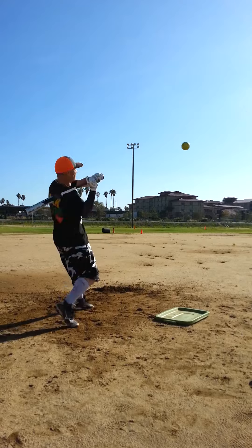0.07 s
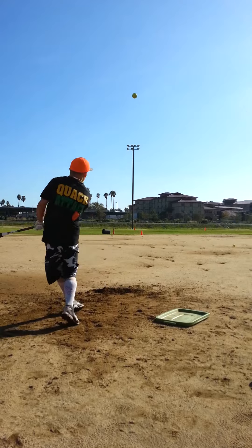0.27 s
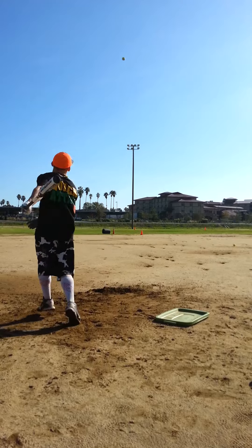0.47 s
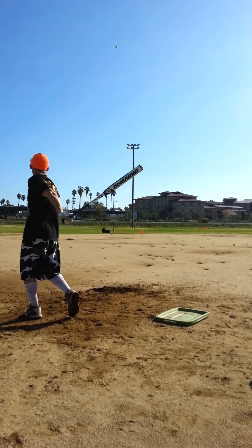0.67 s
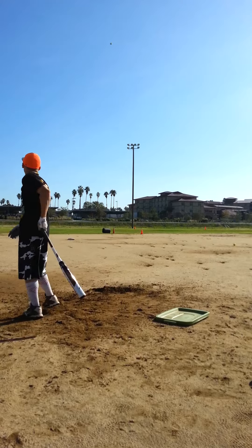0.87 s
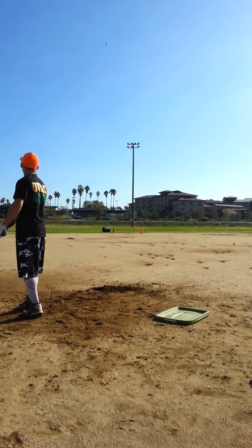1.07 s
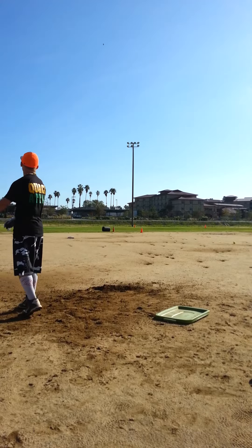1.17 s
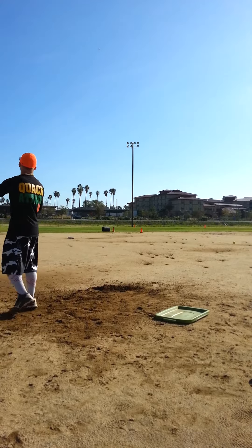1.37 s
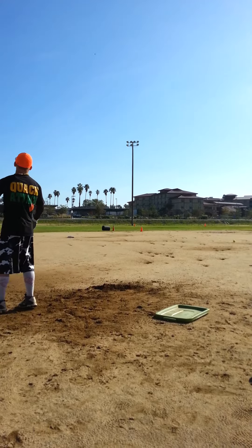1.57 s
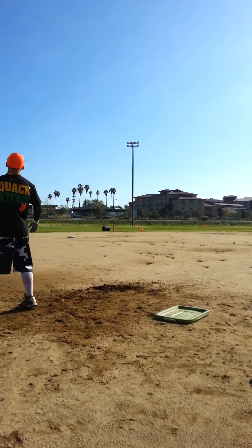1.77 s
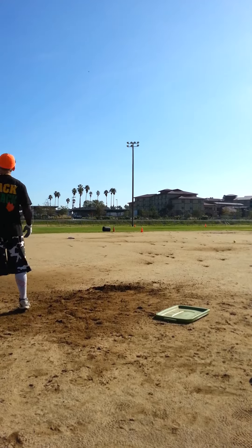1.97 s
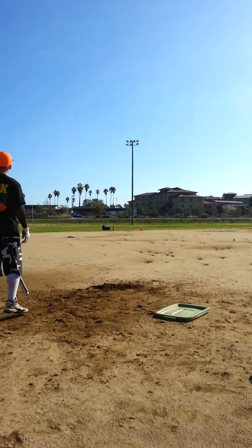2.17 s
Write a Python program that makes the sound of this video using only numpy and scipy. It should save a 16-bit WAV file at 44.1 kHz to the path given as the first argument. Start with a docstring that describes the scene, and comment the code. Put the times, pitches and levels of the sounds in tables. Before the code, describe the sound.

A bat cracks sharply against a softball on an open field, over faint wind.

```python
"""Open dirt field: light wind bumps two microphone ports over a distant traffic wash and a thin hiss.
The batter's shoes scuff the dirt. At 0.23 s a bat cracks against a softball a few metres away:
damped modes plus a burst of squeezed-out air, overloading the microphone. Two quick reflections
follow, then fainter slaps and a scattered tail with a faint falling ring.
More scuffs as the batter steps away; a small gust near 1.8 s."""
import sys
import numpy as np
from scipy import signal
from scipy.fft import rfft, irfft
from scipy.io import wavfile
from scipy.ndimage import uniform_filter1d

SR = 44100
rng = np.random.default_rng(int(sys.argv[2]) if len(sys.argv) > 2 else 0)


def unload_audio(sound):
    """Save the sound as a 16-bit wav file, at the path given as the first command line argument."""
    columns = np.transpose(np.atleast_2d(sound))
    # keep every value between -1 and 1, then stretch to whole-number steps
    steps = np.round(np.clip(columns, -1, 1) * 32767)
    wavfile.write(sys.argv[1], SR, steps.astype(np.int16))


N = 97020
T = np.arange(N) / SR
HIT_S = .2261
AGE_S = np.maximum(T - HIT_S, 0)


def undb(db):
    """Decibels to gain."""
    return 10 ** (np.asarray(db) / 20)


def curve(rows):
    """Gain over time from (s, dB) points."""
    return undb(np.interp(T, *np.array(rows).T))


def pan(db):
    """Constant-power stereo gains; db is left over right."""
    gains = undb([[db / 2], [-db / 2]])
    return gains / np.sqrt(np.mean(gains ** 2))


def noise(spectrum, correlation):
    """Unit-rms stereo noise shaped by (Hz, dB) points."""
    hz, db = np.array(spectrum).T
    gain = undb(np.interp(np.log(np.fft.rfftfreq(N, 1 / SR) + 1), np.log(hz), db))
    mid, side = irfft(rfft(rng.standard_normal((2, N))) * gain, N)
    stereo = np.sqrt(1 + correlation) * mid + np.sqrt(1 - correlation) * side * np.array([[1], [-1]])
    return stereo / stereo.std()


def wander(rate_hz):
    """Smooth random drift, unit deviation."""
    hold = int(SR / rate_hz)
    steps = np.repeat(rng.standard_normal(N // hold + 1), hold)
    drift = uniform_filter1d(steps, hold)[:N]
    return drift / drift.std()


def decay(t60_s):
    """Exponential decay from the hit on."""
    return (T >= HIT_S) * np.exp(-np.log(1000) * AGE_S / t60_s)


def delay(x, lag_s):
    """Circular delay in whole samples."""
    return np.roll(x, int(round(lag_s * SR)), axis=-1)


def butter(x, order, hz, kind):
    """Butterworth filter."""
    return signal.sosfilt(signal.butter(order, hz, kind, fs=SR, output="sos"), x)


def bat_hit():
    """A short contact rings bat and ball and squeezes out a burst of air; the right port hears it first."""
    # Each row: frequency in Hz, relative level in dB, t60 in seconds, pan in dB.
    modes = [(237, -24, .024, -2), (410, -13, 0.022, -3.5), (544, -18, 0.027, 0), (845, -8.5, 0.024, 1),
             (1008, -7.5, 0.019, -2.5), (1087, -12, 0.031, 2), (1325, -11, 0.023, 7.5),
             (1457.5, -6, 0.024, 7), (1580, -18, 0.032, 6), (1750, -14.5, 0.024, 6), (1976, -12, 0.015, 4),
             (2629, -8, 0.019, 1.5), (3564, -3, 0.017, 10), (4056, -7.5, 0.024, 15.5),
             (5160, -16, 0.015, -5), (6350, -13, 0.019, -4.5), (7890, -16, 0.018, 3)]
    # Each row: frequency in Hz, relative density in dB.
    crack_spectrum = [(60, -19), (200, -8.5), (400, -2.5), (600, 0), (1150, -5.5), (1600, -1), (2500, -4.5),
                      (4000, -5.5), (6000, -9), (9000, -17.5), (11000, -25), (15000, -32)]
    ring_db, crack_db, contact_s = 13.5, 15, .00012
    detune = 1 + .0035 * rng.standard_normal(len(modes))
    ring = 0
    for k, (hz, db, t60_s, pan_db) in enumerate(modes):
        mode = decay(t60_s) * np.sin(2 * np.pi * hz * detune[k] * AGE_S)
        ring += (-1) ** k * undb(db) * pan(pan_db) * mode
    crack = undb(crack_db) * decay(t60_s=.0155) * noise(crack_spectrum, correlation=.1)
    blow = (undb(ring_db) * ring + crack) * (1 - np.exp(-AGE_S / contact_s))
    left, right = butter(blow + 1e-18, 2, 120, "high")
    return np.array([delay(left, lag_s=.00008), right]) * pan(db=1.5)


def reflections(hit):
    """Two dulled echoes from close by, then fainter slaps from around the field."""
    # Each entry: delay of a close echo in seconds.
    echo_lags_s = [.01277, .02243]
    # Each row: level in dB, treble edge in Hz, pan in dB.
    echo_colours = [(-10, 3300, 3.5), (-18, 2900, -1)]
    # Each row: delay in seconds, level in dB.
    slaps = [(.053, -40), (.064, -45), (0.075, -36.5), (.087, -39.5), (.105, -41), (.147, -49), (.193, -47)]
    near = sum(undb(db) * pan(pan_db) * butter(delay(hit, lag_s), 1, hz, "low")
               for lag_s, (db, hz, pan_db) in zip(echo_lags_s, echo_colours))
    far = sum(undb(db) * delay(hit, lag_s) for lag_s, db in slaps)
    return near + butter(far, 1, 7000, "low")


def scattered_tail():
    """Sound scattered by the field: grainy noise with a fast and a slow decay."""
    # Each row: frequency in Hz, relative density in dB.
    spectrum = [(30, -45), (120, -26), (330, -16), (600, 5.5), (800, -2), (1050, 6.5), (1550, 0), (2150, 2),
                (2900, -7.5), (3700, 3), (4600, -3), (5600, -13.5), (8000, -14.5), (11000, -29),
                (15000, -50)]
    early_db, late_db, rise_s = -7.5, -23.5, .0065
    rise = 1 - np.exp(-AGE_S / rise_s)
    fall = undb(early_db) * decay(t60_s=.068) + undb(late_db) * decay(t60_s=.53)
    return rise * fall * noise(spectrum, correlation=.16) * undb(1.8 * wander(249)) * pan(db=4.5)


def sagging_ring():
    """A faint noise band in the tail falls in pitch, as from a row of evenly spaced posts."""
    start_hz, floor_hz, width_hz, sag_s = 770, 420, 150, .14
    level_db, end_s = -38, .5
    hz = floor_hz + (start_hz - floor_hz) * np.exp(-AGE_S / sag_s)
    carrier = np.exp(2j * np.pi * np.cumsum(hz) / SR)
    band = np.real(carrier * (wander(width_hz) + 1j * wander(width_hz)))
    gate = np.clip((end_s - T) / .04, 0, 1)
    return undb(level_db) * decay(t60_s=1.1) * gate * band


def scuffs():
    """Shoes and cloth scrape as the batter strides, pivots and steps away; weight adds a lower crunch."""
    # Each row: start in seconds, length in seconds, level in dB, crunch in dB re the scrape.
    strokes = [(0.018, 0.034, -43.5, -20), (0.051, .045, -44.5, -15), (0.158, 0.15, -45.5, -18),
               (0.437, .025, -45.5, -3), (0.606, 0.045, -42.5, -1.5), (0.687, 0.054, -48, -3),
               (0.73, 0.0069, -55, -8), (0.777, 0.076, -54.5, -8), (1.813, 0.11, -52, -10),
               (1.895, 0.25, -57.5, -10)]
    # Grit under a sole, then its crunch under load. Each row: frequency in Hz, relative density in dB.
    grit_spectrum = [(100, -32), (400, -20), (1200, -7.5), (1900, 2), (2800, -5.5), (3400, 0.5), (4300, 1),
                     (5200, -6), (5900, -13), (8000, -12.5), (11000, -39), (15000, -34)]
    crunch_spectrum = [(400, -30), (1500, -12), (1750, 3), (1980, -2), (2150, -10), (2350, -5), (2700, -24),
                       (6000, -43)]
    attack_s, release_s, grain_db = .0057, .032, 1.5
    scrape = crunch = 0
    for start_s, length_s, db, crunch_db in strokes:
        attack = np.clip((T - start_s) / attack_s, 0, 1)
        release = np.exp(-np.maximum(T - start_s - length_s / 2, 0) / min(release_s, length_s))
        scrape += undb(db) * attack * release
        crunch += undb(db + crunch_db) * attack * release
    dirt = scrape * noise(grit_spectrum, correlation=.063)
    dirt += crunch * noise(crunch_spectrum, correlation=.1)
    return dirt * undb(grain_db * wander(400))


def buffets():
    """Each eddy bumps mainly one port: a brief low thump with a weaker, deeper partial."""
    # Each row: centre in seconds, width in seconds, level in dB, frequency in Hz, pan in dB.
    eddies = [(0.134, 0.002, -20.5, 192, -29), (0.148, 0.0061, -23, 128, -26),
              (0.1576, 0.0049, -13.5, 272, -34), (.179, 0.0051, -25.5, 210, -13),
              (.405, .006, -25, 165, -31), (0.498, 0.0054, -26, 156, -25), (1.818, 0.013, -28.5, 111, 5),
              (1.874, 0.011, -27, 150, -18), (1.8852, 0.0061, -13, 262, -38)]
    sub_db, sub_ratio = -15, .4
    thumps = 0
    for centre_s, width_s, db, hz, pan_db in eddies:
        phase, sub_phase = rng.random(2)
        cycles = hz * (T - centre_s)
        tone = np.sin(2 * np.pi * (cycles + phase))
        sub = undb(sub_db) * np.sin(2 * np.pi * (sub_ratio * cycles + sub_phase))
        envelope = np.exp(-((T - centre_s) / width_s) ** 2)
        thumps += undb(db) * envelope * (tone + sub) * pan(pan_db) / np.sqrt(2)
    return thumps


def wind():
    """Rumble and higher eddies, fluttering separately on each port."""
    # Each row: frequency in Hz, relative density in dB.
    rumble_spectrum = [(20, -30), (38, -24), (58, -5), (100, -1.5), (160, 0.5), (250, -9), (350, -18.5),
                       (500, -26), (1000, -54.5)]
    eddy_spectrum = [(60, -29), (150, -5.5), (230, 2.5), (330, -1), (450, -16), (900, -46.5)]
    # Each row: time in seconds, level in dB.
    rumble_levels = [(0, -39), (.3, -44), (.5, -40.5), (.62, -44), (.8, -42), (1.0, -45), (1.2, -42),
                     (1.36, -40.5), (1.68, -41.5), (1.82, -33), (1.93, -42.5), (2.2, -45.5)]
    eddy_levels = [(0, -47.5), (.45, -48.5), (.95, -62), (1.2, -50.5), (1.35, -45), (1.45, -53.5),
                   (1.6, -41.5), (1.69, -45.5), (1.81, -35), (1.86, -43.5), (1.95, -50), (2.2, -49)]
    flutter_db = 1.3 * np.array([wander(24.98), wander(25.21)])
    rumble = noise(rumble_spectrum, correlation=.44) * curve(rumble_levels) * pan(db=-1.5)
    eddies = noise(eddy_spectrum, correlation=.41) * curve(eddy_levels)
    return undb(flutter_db) * (rumble + eddies)


def background():
    """Far traffic wash, a thin distant sizzle near 4 kHz and microphone self-noise."""
    # Each row: frequency in Hz, relative density in dB.
    traffic_spectrum = [(30, -31), (100, -8.5), (400, 0), (900, 1), (1300, -1), (1800, -8), (2500, -17.5),
                        (3600, -18.5), (4500, -25.5), (5500, -42), (15000, -55)]
    sizzle_spectrum = [(2000, -15), (3400, -11), (4200, 1), (4600, -5), (5200, -20), (8000, -19),
                       (12000, -37)]
    # Each row: time in seconds, level in dB.
    sizzle_levels = [(0, -56), (.6, -66), (.8, -61), (1.0, -57), (1.12, -59), (1.14, -54), (1.165, -55),
                     (1.2, -63), (1.3, -69), (1.6, -76), (2.2, -73)]
    traffic_db, self_noise_db = -43, -58
    traffic = undb(traffic_db + .52 * wander(5.3)) * noise(traffic_spectrum, correlation=.71)
    sizzle = curve(sizzle_levels) * noise(sizzle_spectrum, correlation=.24) * undb(2.4 * wander(40.3))
    return traffic + sizzle + undb(self_noise_db) * rng.standard_normal((2, N))


def scene():
    """The hit and its echoes over footwork, wind and background."""
    hit = bat_hit()
    field = reflections(hit) + scattered_tail() + sagging_ring()
    return hit + field + scuffs() + buffets() + wind() + background()


def record(dry):
    """Overload clips the crack flat; deep bass and top treble are cut."""
    clip_level, low_hz, top_hz = .97, 45, 14650
    clipped = np.clip(dry, -clip_level, clip_level)
    thinned = butter(clipped, 2, low_hz, "high")
    return signal.sosfilt(signal.ellip(8, .2, 70, top_hz, fs=SR, output="sos"), thinned)


dry = scene()
out = record(dry)
unload_audio(out)
```